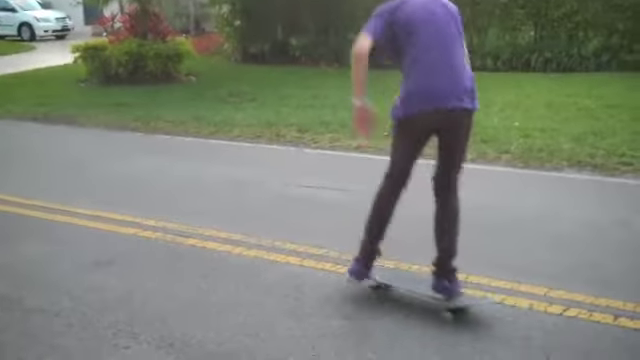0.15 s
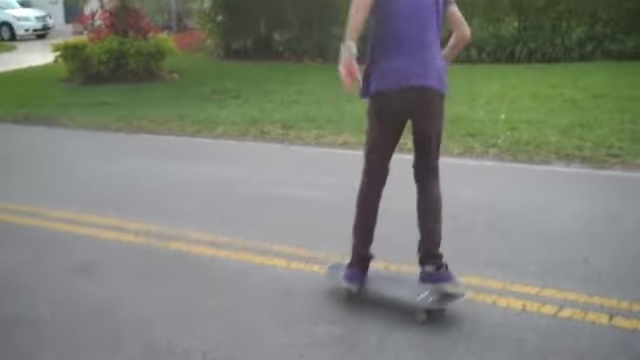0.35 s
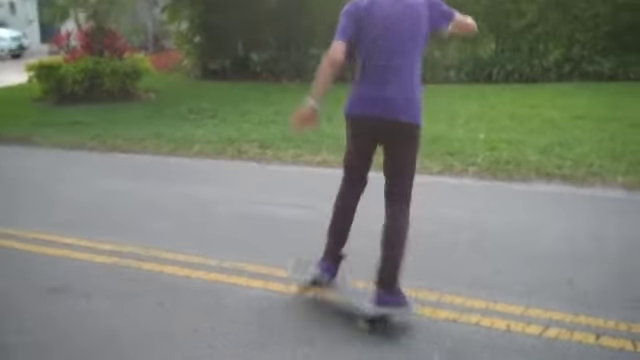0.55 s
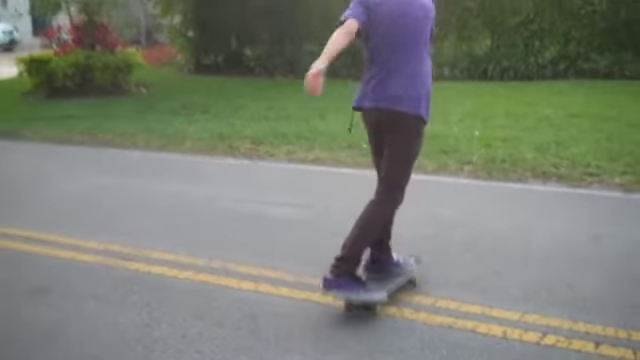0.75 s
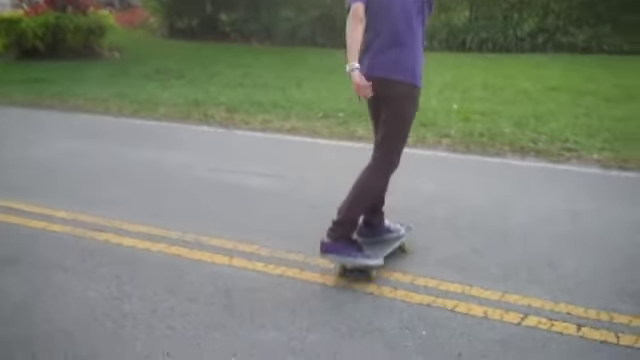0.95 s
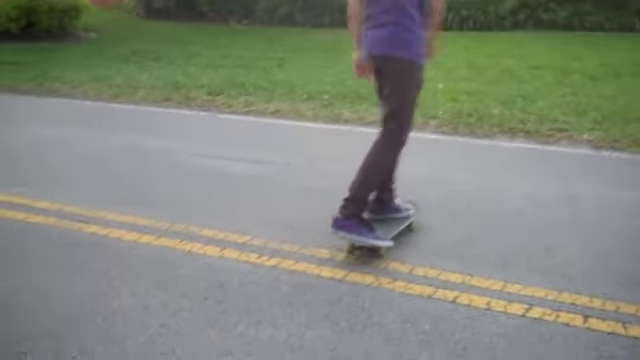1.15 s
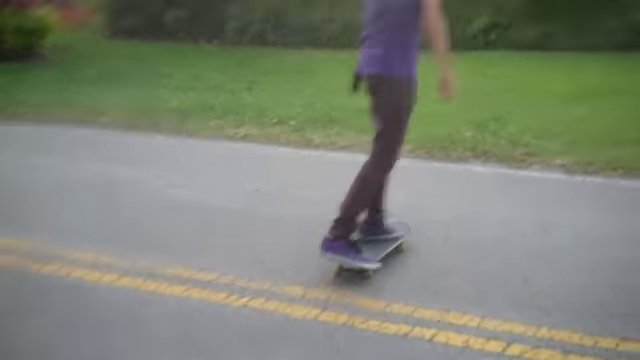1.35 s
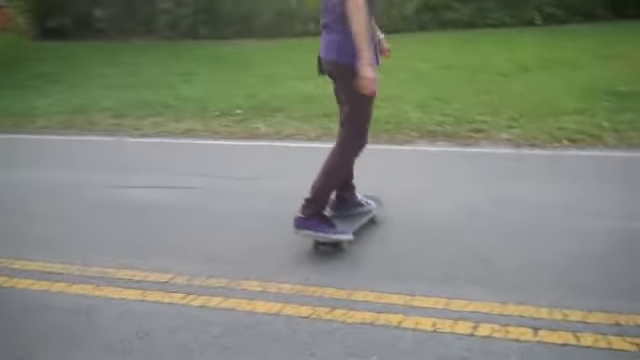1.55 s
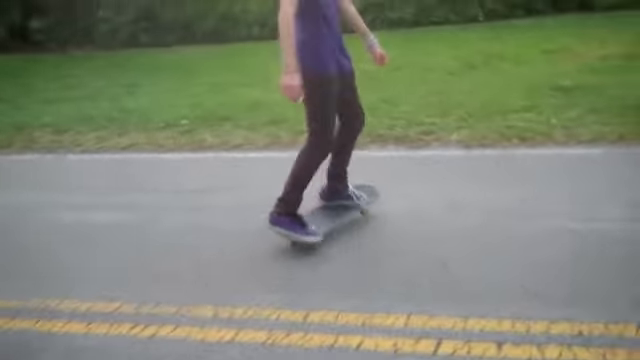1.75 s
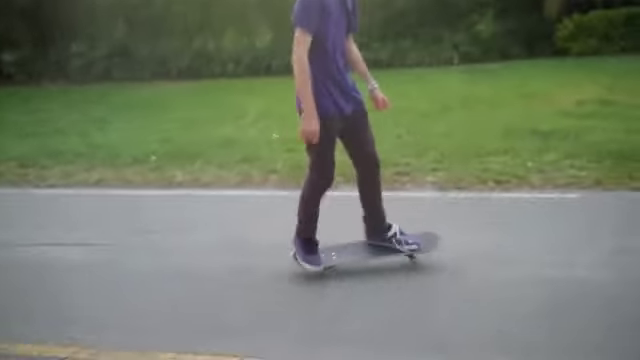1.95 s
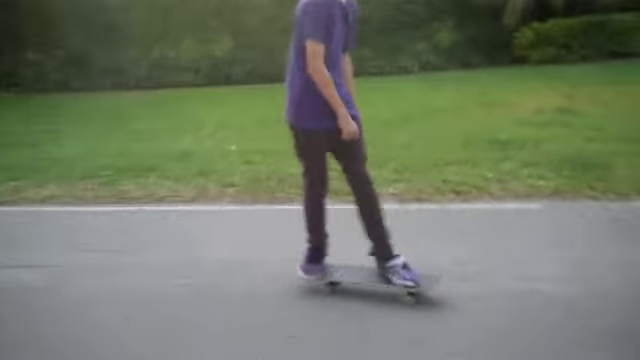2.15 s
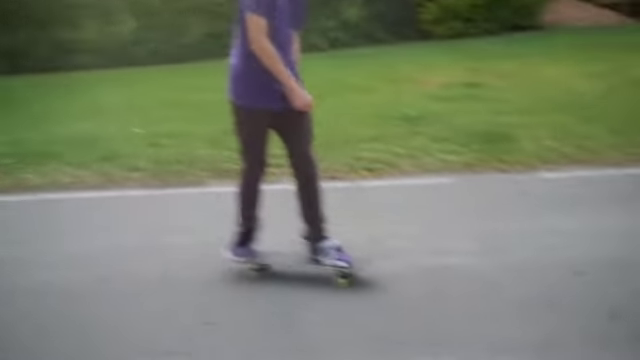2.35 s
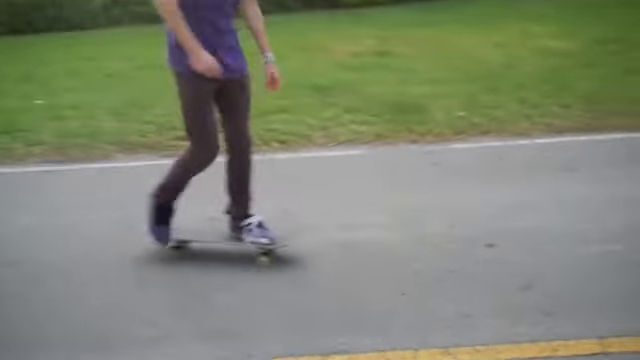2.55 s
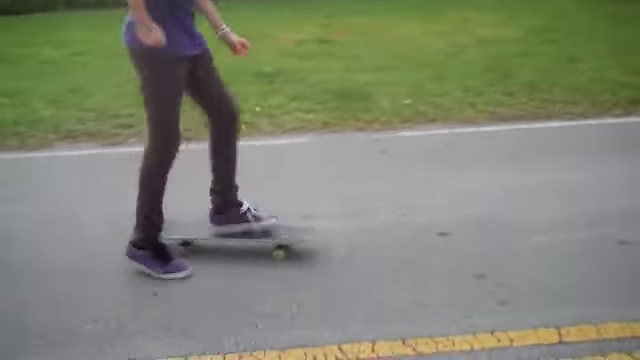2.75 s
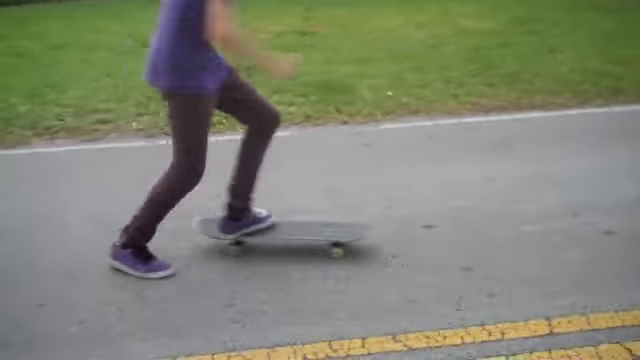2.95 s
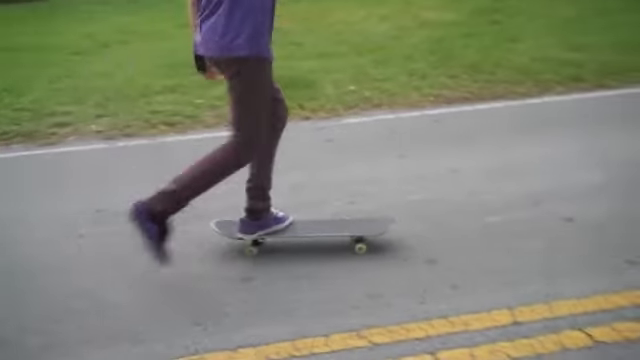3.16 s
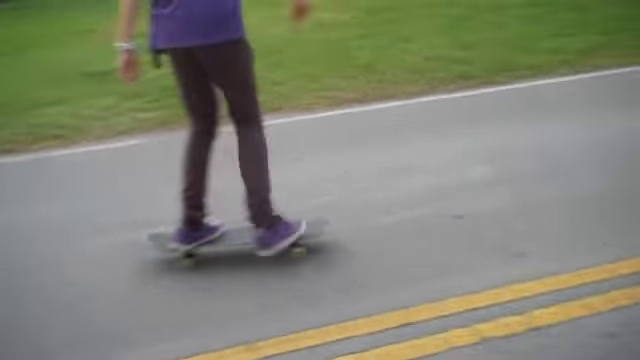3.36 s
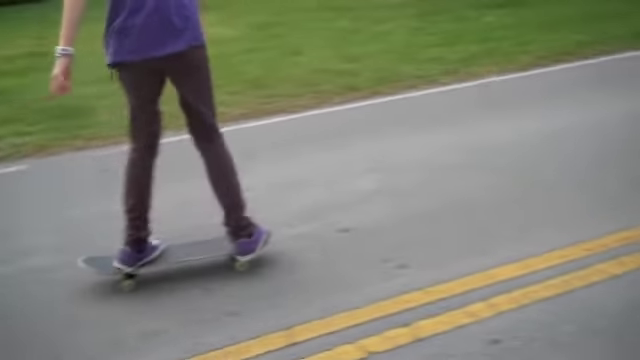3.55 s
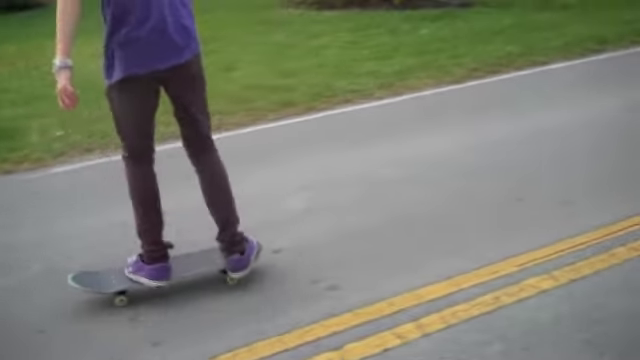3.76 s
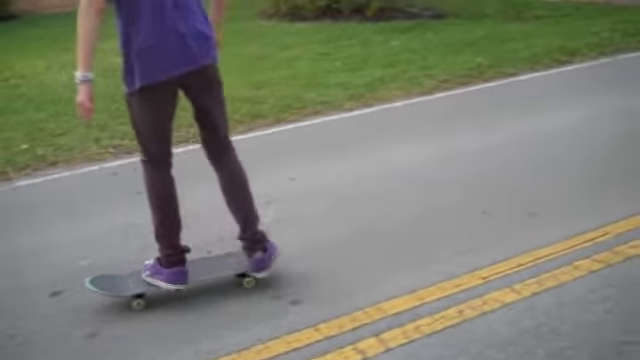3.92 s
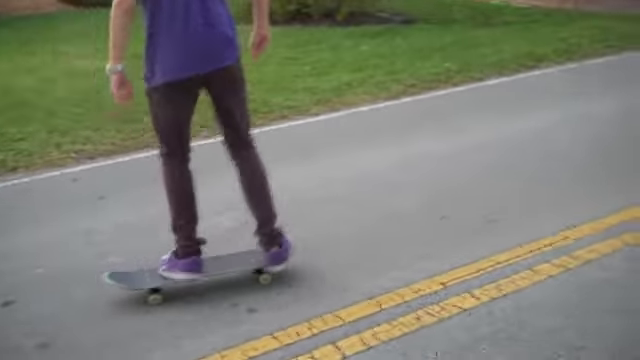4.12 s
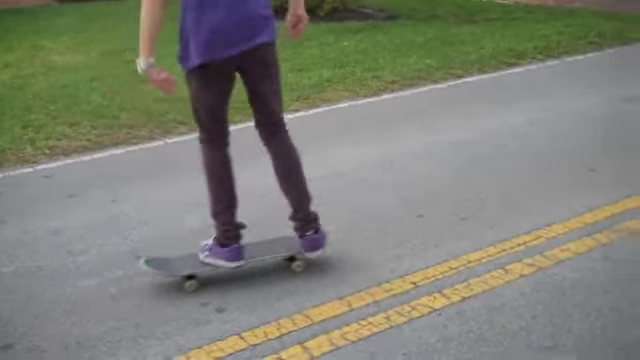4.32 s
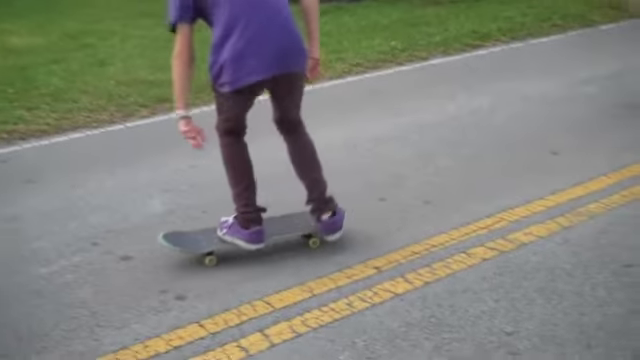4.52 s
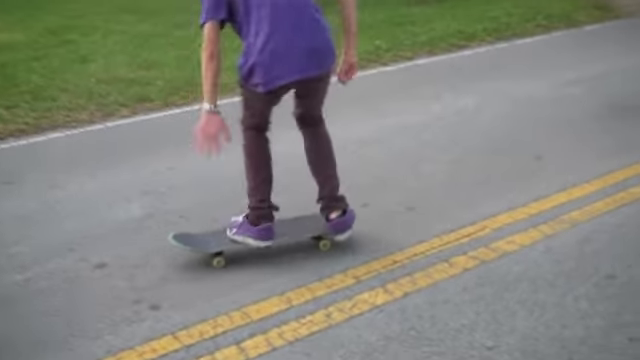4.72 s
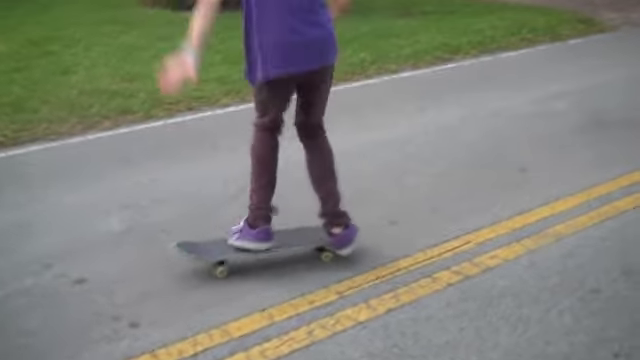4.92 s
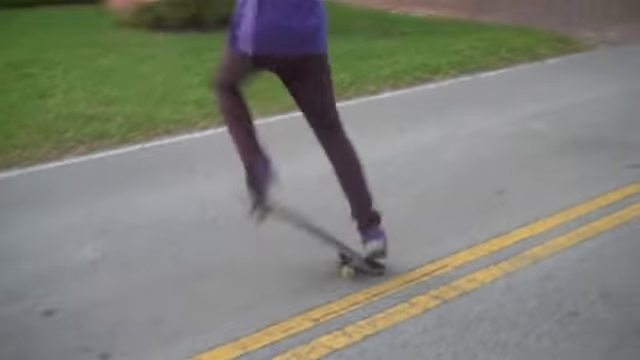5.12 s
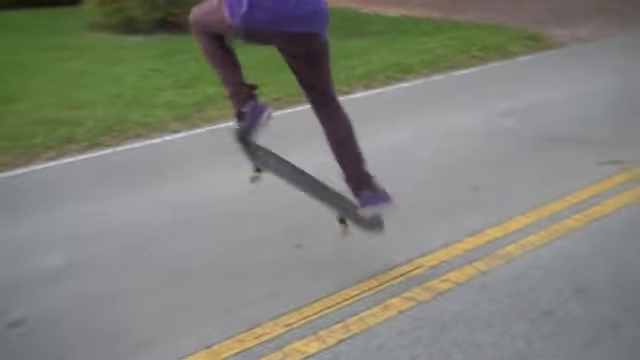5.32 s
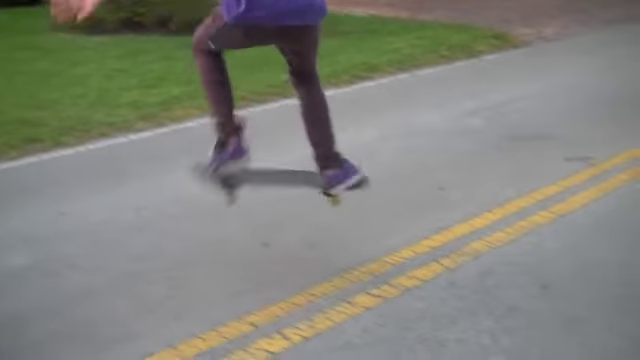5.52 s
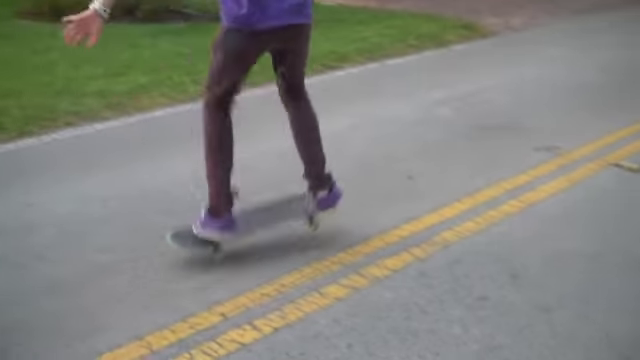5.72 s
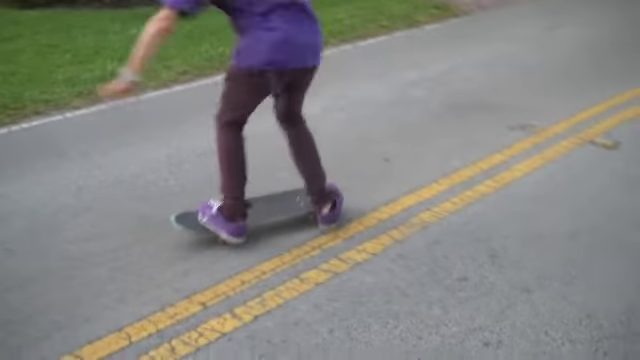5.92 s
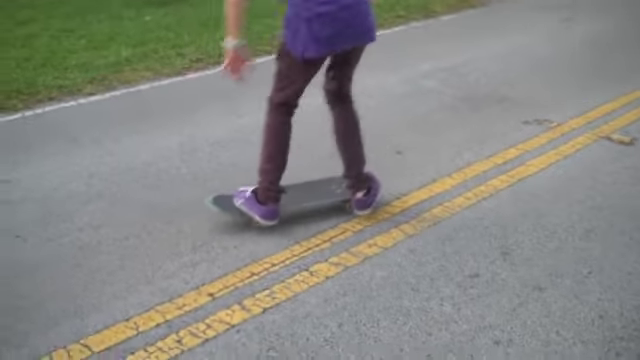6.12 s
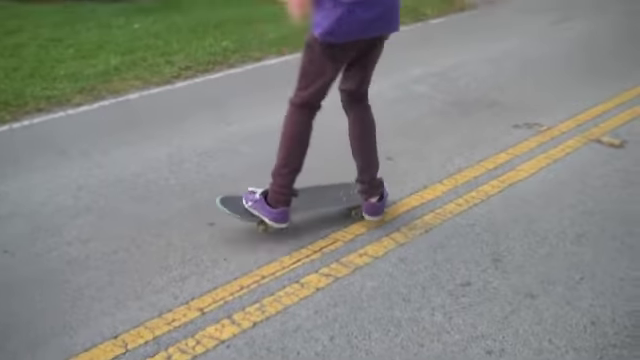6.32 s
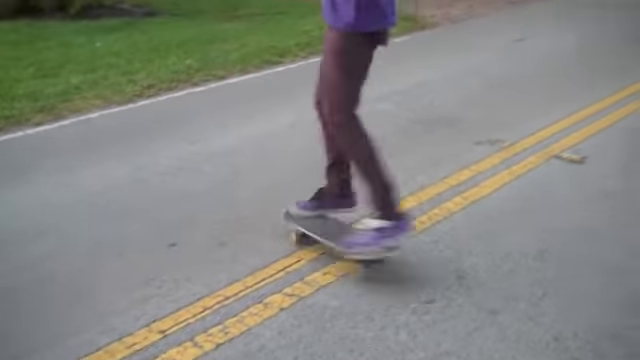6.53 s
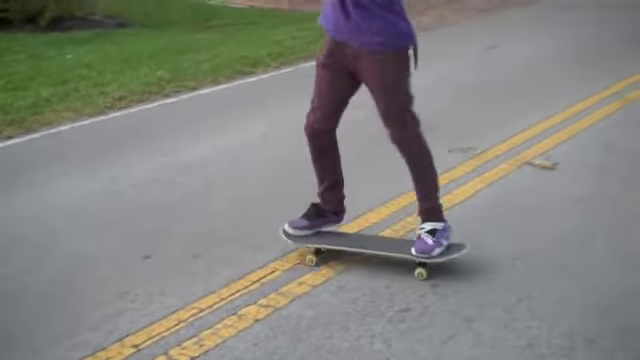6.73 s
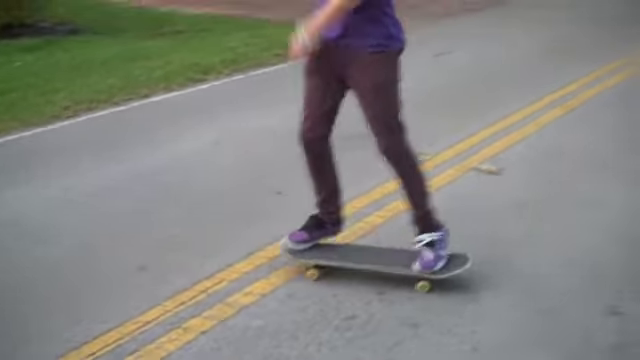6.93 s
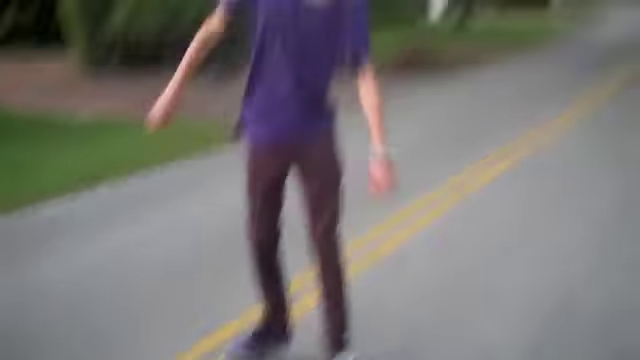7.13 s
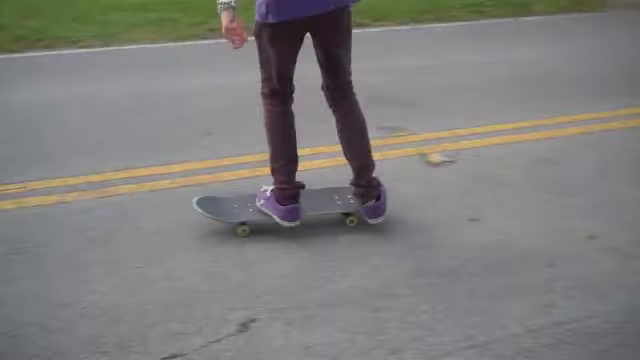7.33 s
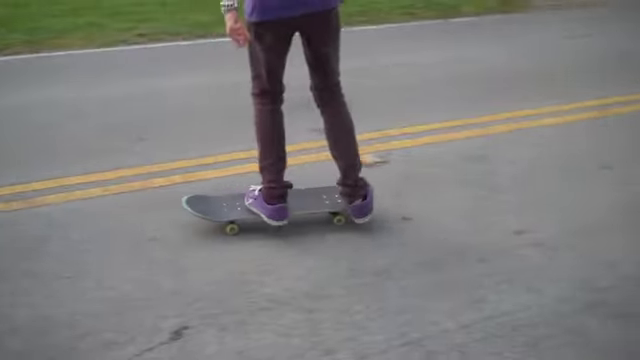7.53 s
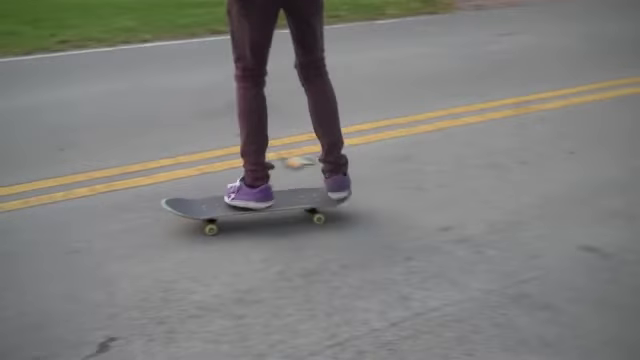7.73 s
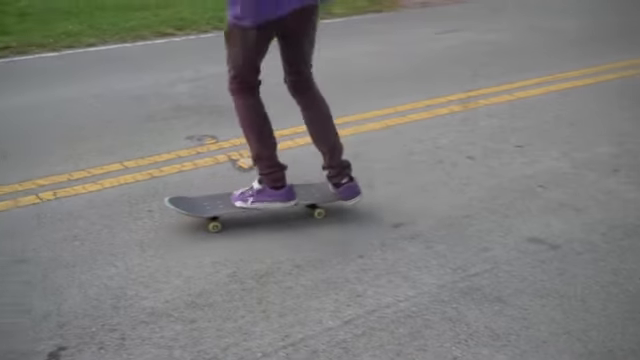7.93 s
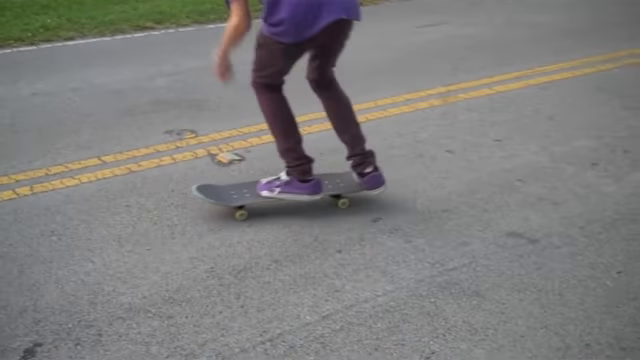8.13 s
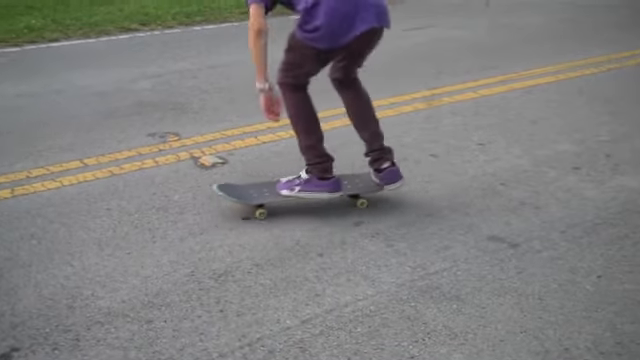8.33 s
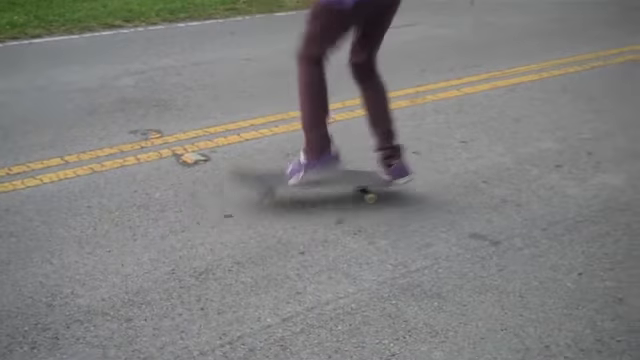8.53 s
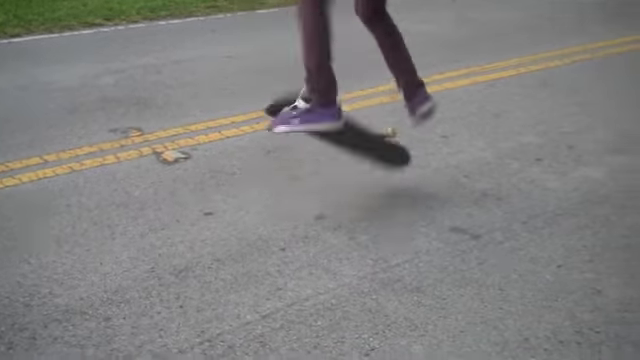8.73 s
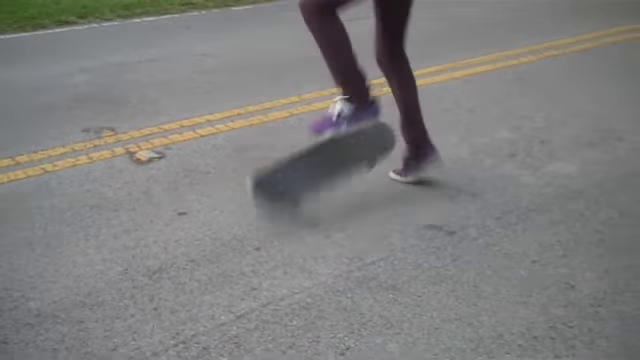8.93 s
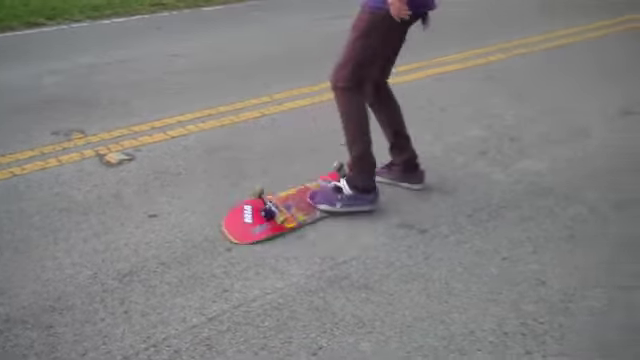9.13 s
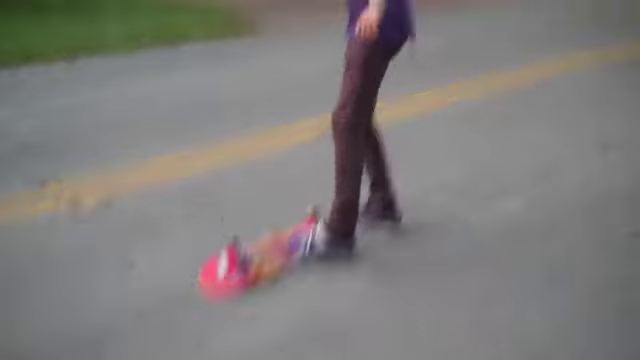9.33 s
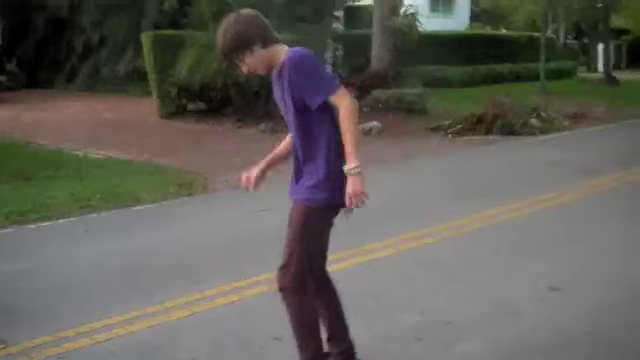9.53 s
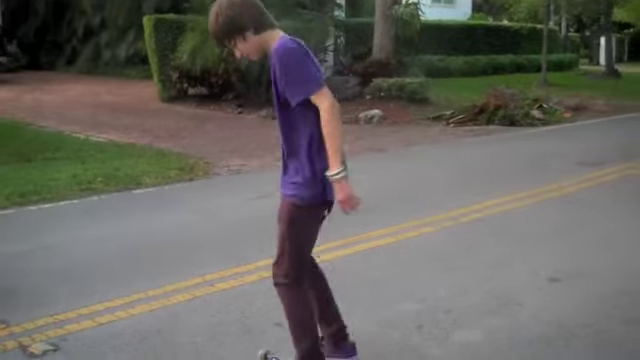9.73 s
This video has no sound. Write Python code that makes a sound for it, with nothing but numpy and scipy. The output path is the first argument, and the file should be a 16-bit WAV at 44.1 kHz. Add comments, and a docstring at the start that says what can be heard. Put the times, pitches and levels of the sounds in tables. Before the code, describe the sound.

Close stereo sound of a skateboard on rough asphalt in a quiet street with a faint echo. It opens with a rapid burst of hard wood-and-metal clacks within 0.12 s, then gritty rolling, a scrape and another sharp clack near 0.85. Rolling swells around 2.0; a bright clack at 2.3 leads into rubbery sole scuffs, a swivelling grind from 2.7 and ticks at 2.9-3.3. Wheels rumble and hum waveringly from 3.7 to 4.6. About 4.8-6.0 everything runs at half speed, an octave lower: grinding, a dull pop at 5.3, a pebble knock, then a strong woody landing at 5.93. Normal speed returns with a pivot scrape at 6.5, clacks at 6.75 and 7.26, and fuller rolling from 7.5. Quick metallic ticks patter through 8.0-8.4. A pop at 8.76 precedes two loud, distorted slams at 9.09 and 9.16, a smaller knock, then faint scrapes and ticks.

```python
"""A skateboard rolls over rough asphalt: grit contacts ring damped resonances of deck, wheels and trucks.
Grinds raise the grit's level as the rider shoves and swivels; bearings click, loaded wheels hum.
Blows ring the board and leave it shaking; skids, scuffs, steps, ticks and pebbles are timed noise bursts.
One ollie passes at half speed, an octave lower; at the end the board slams down on its back.
Close stereo microphone on a quiet street with a faint echo; the hardest landings overload it."""
import sys
import numpy as np
from scipy import signal
from scipy.fft import rfft, irfft, next_fast_len
from scipy.io import wavfile
from scipy.ndimage import uniform_filter1d, map_coordinates

SR = 44100
rng = np.random.default_rng(int(sys.argv[2]) if len(sys.argv) > 2 else 0)


def pcm_store(signal):
    """Save signal as 16-bit PCM."""
    levels = np.round(np.clip(np.atleast_2d(signal), -1, 1) * 32767)
    wavfile.write(sys.argv[1], SR, levels.astype(np.int16).T)


N = 435266
TIME_S = np.arange(N) / SR

# Times are as heard; lengths are at normal speed.
# Rolling over the ride; rumble is high while the rider's weight is on the deck:
# time_s, roll_db, rumble_re_roll_db
ROLL = [(0, -42, 6.5), (.34, -46.5, -4.5), (.55, -40.5, -6), (1.05, -49, -2.5), (2.0, -40, 0),
        (2.3, -45.5, -4.5), (2.73, -52.5, -3.5), (2.9, -43, -29), (3.15, -39, -7), (3.4, -43, -6),
        (3.68, -45.5, 0), (3.78, -40.5, -2.5), (4.2, -42.5, -1), (4.38, -37.5, -10.5), (4.551, -43, 2.5),
        (4.7, -41, 0.5), (4.851, -43, -6), (5.851, -50.5, -2), (6.05, -49.5, -18.5), (6.4, -50, 0.5),
        (6.85, -46, -3.5), (7.4, -48, -2.5), (7.53, -40, -0.5), (7.95, -43.5, -4), (8.1, -45.5, 0),
        (8.36, -47, 1.5), (8.5, -49, -11), (8.85, -47.5, 1.5), (9.0, -53.5, 1.5), (9.87, -54.5, 2)]
# Blows of tail, wheels and deck on the road; deck pitch depends on where the board is struck:
# start_s, knock_db, rattle_s, thud_re_knock_db, wood_re_knock_db, metal_re_knock_db, deck_pitch_ratio
BLOWS = [(.009, -17, .005, -15, -3, 0, 1), (0.015, -19, 0.0035, -14, -11, 4, 0.93),
         (0.0241, -19, 0.01, -24, -1, 1, 1.17), (0.065, -10, 0.0064, -16, -5, 0.5, 0.98),
         (.075, -19, 0.0045, -10, 5.5, 1, 1.02), (0.0925, -11, 0.0018, -16.5, -8.5, -11, 1.24),
         (.115, -22, 0.0082, -4, 2.5, -0.5, 0.94), (.399, -25.5, 0.0071, -15, -6.5, -2, 1.06),
         (0.4578, -27.5, 0.01, -10, 3.5, 6, 1), (0.8113, -23, 0.0048, -30, -1, -3, 1.1),
         (0.841, -15, 0.0041, -16, -8.5, -2.5, 0.97), (0.8551, -17, 0.005, -10, -6, 0.5, 1),
         (1.142, -29, 0.0055, -6.5, -0.5, -2, 1.22), (2.2796, -15.5, 0.0025, -47, -10, 2, 1.044),
         (3.76, -29.5, 0.01, -19, 0, 2.5, 0.99), (4.455, -23.5, 0.0091, -7.5, -5, 1, 1.02),
         (5.313, -15.5, 0.0053, -9.5, -2, 2, 1), (5.927, -11, 0.0075, -3.5, 7.5, 5, 1),
         (6.745, -19, 0.0026, -17, -2.5, 3, 0.97), (6.7539, -15.5, 0.0057, -35, -8.5, 0.5, 0.96),
         (6.778, -22, 0.0089, -30, -6, 1, 0.99), (7.2574, -19.5, 0.005, -20, -1, 1.5, 1.05),
         (7.262, -17.5, 0.0073, -11.5, 5, 4.5, 1), (8.756, -18, 0.0077, -14.5, -10.5, -2, 1.03),
         (9.045, -36.5, .0024, 2, 3, -10, 1.02), (9.09, -7, 0.0039, -2, -0.5, 1.5, 0.99),
         (9.105, -21.5, 0.0035, 0, 6.5, -1, 1.01), (9.1553, -7.5, 0.0035, -2, 7, -4.5, 1.075),
         (9.217, -18.5, 0.007, -11, 2.5, -3, 0.95)]
# Sharp ticks of bearings and loose stones: start_s, level_db
TICKS = [(2.905, -20), (3.189, -19), (3.224, -23), (3.304, -18), (3.326, -18), (3.342, -11), (4.597, -12),
         (4.687, -25), (4.706, -21), (5.272, -11), (5.281, -8), (6.399, -23.5), (6.698, -13), (7.116, -20),
         (7.9997, -18), (8.0423, -13.5), (8.061, -16), (8.072, -17), (8.1425, -15), (8.19, -14.5),
         (8.2312, -12.5), (8.286, -17), (8.327, -13), (8.3805, -25), (8.4015, -16), (8.434, -14.5),
         (9.586, -14), (9.828, -14.5)]
# Pebbles cracking under a wheel, higher for small stones: start_s, level_db, pitch_ratio
PEBBLES = [(3.557, -22, 1.4), (4.049, -20.5, 1.07), (4.903, -24, 2.2), (4.934, -21.5, 1.9),
           (5.605, -16, 1.76), (7.215, -22.5, 1.1)]
# Skids of wheels, soles and deck: start_s, length_s, level_db, pitch_hz, width_hz
SKIDS = [(0.576, 0.065, -35, 3470, 500), (0.738, 0.15, -31, 1690, 1000), (0.808, 0.034, -22.5, 1770, 700),
         (1.144, 0.041, -32.5, 805, 550), (1.172, 0.32, -41, 2300, 1403), (1.771, 0.26, -34.5, 1960, 1600),
         (2.477, 0.066, -38, 750, 680), (2.821, 0.49, -42.5, 1530, 1090), (5.121, 0.1, -25.5, 7380, 2500),
         (6.038, 0.29, -42, 1350, 1290), (6.57, .17, -36.5, 1700, 1470), (6.924, 0.075, -33, 7100, 1490),
         (7.733, 0.067, -28, 6750, 900), (8.395, 0.3, -39.5, 2540, 3870), (8.72, 0.1, -34, 6900, 2580),
         (9.24, 0.24, -43, 840, 450), (9.783, 0.1, -37, 1940, 1510)]
# Board ground over grit by a shove or swivel; bass is the weight behind it:
# start_s, length_s, level_db, bass_re_level_db
GRINDS = [(0.618, 0.39, -43.5, 5), (2.702, 0.51, -37.5, 3), (3.488, 0.11, -39.5, 4.5),
          (4.27, 0.18, -42, -6), (5.005, 0.24, -34.5, 8), (5.612, 0.047, -39.5, 3),
          (6.421, 0.031, -40.5, -26), (6.538, 0.22, -41, 6.5), (7.097, 0.076, -43.5, -18),
          (7.254, 0.079, -40.5, -15), (7.78, 0.27, -39.5, 1), (8.613, 0.24, -37, 0.5),
          (9.602, 0.1, -48, 12), (9.786, 0.19, -44.5, 7)]
# Feet coming down or pushing off on deck or road: start_s, level_db
STEPS = [(2.882, -35), (3.557, -33.5), (3.93, -33.5), (5.14, -28), (5.23, -31.5), (6.029, -33.5),
         (8.66, -35.5)]
# Sole dragged over grip tape or road: start_s, length_s, level_db
SCUFFS = [(0.208, 0.14, -34.5), (0.38, 0.0077, -31), (0.638, 0.055, -26), (2.293, 0.015, -30),
          (2.313, 0.12, -31), (2.44, 0.033, -33.5), (2.584, 0.03, -39), (2.658, 0.031, -38),
          (9.361, 0.0176, -31)]
# Stretches where the wheels sing: start_s, length_s, level_db, overtone_re_level_db
HUMS = [(2.847, 0.95, -52, -12), (3.683, 0.97, -42.5, -20), (4.305, 0.21, -44, 1.5), (7.544, 0.89, -51, -5),
        (7.797, 0.24, -42.5, -4)]
# Brief level dips between tricks: middle_s, width_s
DIPS = [(4.822, 0.096), (5.962, 0.057), (7.422, 0.055)]

# Flexing of the board: pitch_hz, width_hz, level_db
FLEX_MODES = [(119, 23, -9.5), (268, 180, 0), (350.5, 54, 0.5)]
# Whole deck bending under a blow: pitch_hz, width_hz, level_db
THUD_MODES = [(125, 60, -16), (350, 120, 1.5)]
# Deck resonances: pitch_hz, width_hz, level_db
DECK_MODES = [(601, 64, -5.5), (733.4, 142, 1), (867, 113, -4)]
# Deck overtones that only a blow wakes: pitch_hz, width_hz, level_db
DECK_OVERTONES = [(1408, 117, -9.5), (2300, 150, -16)]
# Wheel resonances: pitch_hz, width_hz, level_db
WHEEL_MODES = [(1465, 290, 4), (1863, 216, 1), (2291, 280, 2.5), (2790, 480, -8), (3480, 320, -8)]
# Truck resonances: pitch_hz, width_hz, level_db
TRUCK_MODES = [(3260, 1020, -2.5), (4960, 1500, -6.5), (6946, 1680, 2), (7300, 1430, -4.5),
               (8080, 1470, -10), (9740, 910, -12.5), (13220, 24000, -21.5)]
# Sole resonances before bending: pitch_hz, width_hz, level_db
SOLE_MODES = [(2660, 470, -0.5), (3650, 700, -4.5), (5170, 490, 0.5), (7100, 1100, 1)]

# Left port against right: freq_hz, left_re_right_db, left_lead_rad, likeness_ratio
PORTS = [(100, -1, -0.31, 1), (2000, 0, 0.0047, 0.93), (5200, 0.5, -0.93, 0.99), (6660, -4, -0.13, 0.35),
         (7360, 2, -0.39, 0.27), (7900, 10.5, 0.79, 0.49), (10000, 7.5, -1.6, 0.46), (13000, 20, -.7, .5)]
# Street echo decay: freq_hz, t60_s
STREET = [(150, 0.23), (800, 1.05), (3000, 1.8), (9000, 1.8)]

# Answer of each part of the board: to_rolling_db, to_grinding_db, to_shaking_db
# Flexing
RUMBLE_DB = (-1.5, -16.5, -11.5)
# Deck
DRONE_DB = (0.6, -6, -10)
# Wheels
SCRUB_DB = (-0.3, 0.5, -6.5)
# Trucks
SIZZLE_DB = (1, 6.5, -1)

SLOW_FROM_S, SLOW_TO_S = 4.82, 5.96
MIC_EDGE_HZ, EDGE_HZ = 14400, 16400
GRAVEL_PER_S, GRAVEL_RE_ROLL_DB = 70, -4.5
BEARING_CLICKS_PER_S, BEARING_RE_ROLL_DB = 55, -3.5
# Sizzle and bearings gain this many extra dB per dB of rolling above the cruise
CRUISE_DB, SIZZLE_GROWTH_DB_PER_DB = -49.5, 0.42
GRIND_TAPER_RATIO = 0.47  # share of a grind spent swelling and fading
SHAKE_RE_KNOCK_DB, SHAKE_DB_PER_THUD_DB, SHAKE_FALL_DB_PER_S = -25.5, 0.097, 72
STRIKE_RATIO = 0.5  # first clean contact re the chatter that follows
PEBBLE_RATTLE_S = 0.0028
SKID_SAG_RATIO = 0.039  # pitch fall as a skid slows
STEP_DECAY_S, STEP_DECK_RE_FLEX_DB = 0.02, 5
SOLE_BEND_RATIO = 0.03  # rms wander of the sole resonances
HUM_HZ, OVERTONE_HZ, HUM_WAVER_RATIO = 731, 2280, 0.03216  # waver of the lower note


def gain_of(db):
    """Decibels to amplitude."""
    return 10 ** (np.asarray(db) / 20)


def unit_rms(x):
    """Scales to rms 1."""
    return x / np.sqrt(np.mean(x ** 2) + 1e-20)


def read(points, hz):
    """Table columns interpolated over log frequency."""
    f, *columns = np.transpose(points)
    return [np.interp(np.log(hz + 1), np.log(f), c) for c in columns]


def street_time(heard_s):
    """Street time at a heard time; it runs at half speed in the slow motion."""
    return heard_s - .5 * np.clip(heard_s - SLOW_FROM_S, 0, SLOW_TO_S - SLOW_FROM_S)


def add(mix, heard_s, sound):
    """Mixes a sound in so that it is heard at the given time."""
    start = max(round(street_time(heard_s) * SR), 0)
    part = mix[start:][:len(sound)]
    part += sound[:len(part)]


def low_pass(x, hz):
    """Steep band limit on both channels."""
    taps = signal.firwin(301, hz, window=("kaiser", 8), fs=SR)
    return signal.oaconvolve(x, taps[None], "same")


def ring(x, modes, size=4096):
    """Causal minimum-phase response of damped resonances with steep skirts."""
    hz = abs(np.fft.fftfreq(size, 1 / SR)) + 1
    power = 0
    for f, width, db in modes:
        detune = (hz ** 2 - f ** 2) / (2 * width * np.sqrt(hz * f))
        power = power + gain_of(db) ** 2 / (1 + detune ** 2 * 2) ** 2
    log_gain = .5 * np.log(power + 1e-10)
    taps = np.fft.ifft(np.exp(np.conj(signal.hilbert(log_gain)))).real
    return signal.oaconvolve(x, taps[:size // 2])[:len(x)]


def grit(per_s, spread_db, size=N):
    """Random stone contacts: most are small, a few large."""
    heights = gain_of(spread_db * np.minimum(rng.exponential(1, size), 3.7))
    return heights * rng.choice([-1, 1], size) * (rng.random(size) < per_s / SR)


def wander(hz):
    """Smooth random signal of rms 1, up to about the given rate."""
    size = next_fast_len(N)
    spectrum = rfft(rng.standard_normal(size))
    smooth = irfft(spectrum / (1 + (np.fft.rfftfreq(size, 1 / SR) / hz) ** 4), size)
    return unit_rms(smooth[:N])


def together(levels_db, *strengths):
    """Unrelated causes add in power, each at its own level."""
    return np.sqrt(sum((gain_of(db) * x) ** 2 for db, x in zip(levels_db, strengths)))


def chatter(rattle_s, size=4096):
    """One clean strike and a dying run of contacts, energy spread fairly evenly over frequency."""
    t = np.arange(size) / SR
    contacts = rng.standard_normal(size) * np.exp(-t / rattle_s)
    spectrum = rfft(contacts / np.linalg.norm(contacts) + STRIKE_RATIO * (t == 0))
    flatter = irfft(spectrum / np.sqrt(abs(spectrum) + 1e-9))
    return flatter * np.exp(-(t / (2 * np.pi * rattle_s)) ** 2)


def shifting(x, depth_db, size=512):
    """The contact point moves, so overtones vary in patches of about 400 Hz and 15 ms."""
    overlap = size * 3 // 4
    hz, _, z = signal.stft(x, SR, nperseg=size, noverlap=overlap)
    patches = uniform_filter1d(rng.standard_normal(z.shape), size=5, axis=0)
    patches = unit_rms(uniform_filter1d(patches, size=5, axis=1))
    # low deck modes answer alike wherever they are struck
    depth = depth_db * np.sqrt(hz / (hz + 1000))[:, None]
    gain = gain_of(depth * np.clip(patches, -2, 2))
    z = z * gain / np.sqrt(np.mean(gain ** 2, axis=1, keepdims=True))
    return signal.istft(z, SR, nperseg=size, noverlap=overlap)[1][:N]


def street(x):
    """Hedges and house fronts scatter a faint, dull tail."""
    echoes = rng.standard_normal(SR) * (rng.random(SR) < 2500 / SR)
    echoes = echoes * (1 - np.exp(-TIME_S[:SR] / 0.003))
    hz, t, z = signal.stft(echoes, SR, nperseg=256)
    decay = gain_of(-60 * t / read(STREET, hz)[0][:, None])
    z = z * decay / np.hypot(1, hz / 2500)[:, None]
    tail = signal.istft(z, SR, nperseg=256)[1]
    return signal.fftconvolve(x, tail / np.linalg.norm(tail))[:N]


def ports(x):
    """Two close ports hear nearly the same bass; the housing shades and scatters the treble."""
    hz, _, z = signal.stft(x, SR, nperseg=64)
    balance_db, lead_rad, likeness = (c[:, None] for c in read(PORTS, hz))
    likeness = np.clip(likeness, 0, 1)
    random_phase = np.exp(2j * np.pi * rng.random(z.shape))
    scatter = np.sqrt((1 - likeness) / (1 + likeness)) * random_phase
    lean = gain_of(balance_db / 2) * np.exp(.5j * lead_rad)
    pair = np.array([z * (1 + scatter) * lean, z * (1 - scatter) / lean])
    pair = pair * 2 / abs(lean + 1 / lean)
    return signal.istft(pair, SR, nperseg=64)[1][:, :N]


def steps(size=8192):
    """A soft sole sets the deck flexing, with no crack."""
    out, t = np.zeros(N), np.arange(size) / SR
    for start_s, db in STEPS:
        force = rng.standard_normal(size)
        flex = unit_rms(ring(force, FLEX_MODES))
        deck = unit_rms(ring(force, DECK_MODES))
        thump = flex + gain_of(STEP_DECK_RE_FLEX_DB) * deck
        add(out, start_s, gain_of(db) * thump * np.exp(-t / STEP_DECAY_S))
    return out


def scuffs():
    """Rubber rasps over fine grit, abruptly on and off; the sole's resonances shift as it bends."""
    level = np.zeros(N)
    for start_s, length_s, db in SCUFFS:
        add(level, start_s, gain_of(db) * signal.windows.tukey(int(length_s * SR), .25))
    force = rng.standard_normal(N) * gain_of(2.6 * wander(hz=159))
    rasp = ring(force, SOLE_MODES)
    position = np.cumsum(1 + SOLE_BEND_RATIO * wander(hz=17))
    bent = map_coordinates(rasp, [position], order=3, mode="mirror")
    return level * unit_rms(bent)


def pebbles():
    """A pebble cracks under a wheel: a short, dry knock."""
    out = np.zeros(N)
    for start_s, db, pitch in PEBBLES:
        modes = np.multiply(WHEEL_MODES, [pitch, pitch, 1])
        crack = ring(chatter(PEBBLE_RATTLE_S), modes)
        add(out, start_s, gain_of(db) * crack / abs(crack).max())
    return out


def ticks(size=1024):
    """Tiny steel contacts ring the trucks for a millisecond or two."""
    out, t = np.zeros(N), np.arange(size) / SR
    for start_s, db in TICKS:
        force = rng.standard_normal(size) * np.exp(-t / 0.0009)
        tick = ring(force, TRUCK_MODES)
        add(out, start_s, gain_of(db - 0.5) * tick / abs(tick).max())
    return out


def skids():
    """Rubber sticks and slips: clumps of small slips feed a resonance that falls as the skid slows."""
    out = np.zeros(N)
    for start_s, length_s, db, pitch_hz, width_hz in SKIDS:
        count = int(length_s * SR)
        grip = unit_rms(uniform_filter1d(rng.standard_normal(SR // 2), size=260))
        slips = grit(per_s=1500, spread_db=3.5, size=SR // 2) * gain_of(0.53 * grip)
        glide_hz = pitch_hz * np.linspace(1, 1 - SKID_SAG_RATIO, count)
        turn = np.exp(2j * np.pi * np.cumsum(glide_hz) / SR)
        # shift down to 0 Hz, low-pass, shift back: a gliding band-pass
        b, a = signal.butter(2, width_hz / 2, fs=SR)
        scrape = (turn * signal.lfilter(b, a, slips[:count] / turn)).real
        add(out, start_s, gain_of(db) * unit_rms(scrape) * signal.windows.tukey(count, .45))
    return out


def humming():
    """Under the rider's weight the wheels sing two notes; the road makes pitch and strength waver."""
    low, high = np.zeros((2, N))
    for start_s, length_s, db, overtone_db in HUMS:
        swell = signal.windows.tukey(int(length_s * SR), .3)
        add(low, start_s, gain_of(db) * swell)
        add(high, start_s, gain_of(db + overtone_db) * swell)
    out = np.zeros(N)
    notes = [(HUM_HZ, HUM_WAVER_RATIO, low), (OVERTONE_HZ, HUM_WAVER_RATIO / 2, high)]
    for hz, waver, level in notes:
        cycles = np.cumsum(hz * (1 + waver * wander(hz=44.4))) / SR
        tone = np.sin(2 * np.pi * cycles) * gain_of(4.1 * wander(hz=30))
        out += level * unit_rms(tone)
    return out


def clacks(size=4096):
    """Each blow rings deck, wheels and trucks; levels are of energy packed into 5 ms."""
    out = np.zeros(N)
    packed = np.sqrt(.005 * SR / size)
    for start_s, db, rattle_s, thud_db, wood_db, metal_db, pitch in BLOWS:
        deck_modes = np.multiply(DECK_MODES + DECK_OVERTONES, [pitch, 1, 1])
        deck = unit_rms(ring(chatter(rattle_s), deck_modes))
        wheels = unit_rms(ring(chatter(rattle_s), WHEEL_MODES))
        thud = unit_rms(ring(chatter(rattle_s), THUD_MODES))
        metal = unit_rms(ring(chatter(rattle_s), TRUCK_MODES))
        blow = wheels + gain_of(wood_db) * deck + gain_of(thud_db) * thud + gain_of(metal_db) * metal
        add(out, start_s, packed * gain_of(db) * blow)
    return out


def bearings():
    """Almost evenly spaced clicks of uneven strength ring the trucks in bursts of 0.69 ms decay."""
    turns = np.cumsum(BEARING_CLICKS_PER_S * (1 + .3 * wander(hz=39.8))) / SR
    clicks = np.diff(np.floor(turns), prepend=0) * rng.random(N)
    bursts = signal.lfilter([1], [1, -np.exp(-1 / (0.00069 * SR))], clicks)
    return unit_rms(ring(bursts * rng.standard_normal(N), TRUCK_MODES))


def grinding():
    """Grind strength at the wheels, and at the deck as the rider's weight passes it on."""
    at_wheels, at_deck = np.zeros((2, N))
    for start_s, length_s, db, bass_db in GRINDS:
        swell = signal.windows.tukey(int(length_s * SR), GRIND_TAPER_RATIO)
        add(at_wheels, start_s, gain_of(db) * swell)
        add(at_deck, start_s, gain_of(db + bass_db) * swell)
    return at_wheels, at_deck


def shaking():
    """Uneven shaking that dies away after each blow, stronger with more thud."""
    power = np.zeros(N)
    for start_s, knock_db, _, thud_db, *_ in BLOWS:
        start_db = knock_db + SHAKE_RE_KNOCK_DB + SHAKE_DB_PER_THUD_DB * thud_db
        add(power, start_s, gain_of(start_db - SHAKE_FALL_DB_PER_S * TIME_S[:SR]) ** 2)
    return np.sqrt(power) * gain_of(2.0 * wander(hz=70))


def rolling():
    """Stones strike the wheels and ring every part of the board; bearings add their rattle."""
    time_s, *columns = np.transpose(ROLL)
    roll, weight = (gain_of(np.interp(TIME_S, street_time(time_s), c)) for c in columns)
    bright = (roll / gain_of(CRUISE_DB)) ** SIZZLE_GROWTH_DB_PER_DB
    grind, deck_grind = grinding()
    shake = shaking()

    stones = unit_rms(grit(per_s=520, spread_db=3.5))
    sand = unit_rms(grit(per_s=9000, spread_db=2.5))
    # coarse patches of road shake all parts together
    road = (sand + 0.88 * stones) * gain_of(2.1 * wander(hz=70))
    coarse = grit(per_s=GRAVEL_PER_S, spread_db=2.0)
    gravel = unit_rms(ring(coarse, DECK_MODES + WHEEL_MODES))
    gravel = gravel * np.sqrt(roll ** 2 + grind ** 2 + (shake / 2) ** 2)

    rumble = unit_rms(ring(road, FLEX_MODES)) * together(RUMBLE_DB, roll * weight, deck_grind, shake)
    drone = unit_rms(ring(road, DECK_MODES)) * together(DRONE_DB, roll, deck_grind, shake)
    scrub = unit_rms(ring(road, WHEEL_MODES)) * together(SCRUB_DB, roll, grind, shake)
    sizzle = unit_rms(ring(road, TRUCK_MODES)) * together(SIZZLE_DB, roll * bright, grind, shake)
    rattle = gain_of(BEARING_RE_ROLL_DB) * roll * bright * bearings()
    return rumble + drone + scrub + sizzle + gain_of(GRAVEL_RE_ROLL_DB) * gravel + rattle


def scene():
    """The board and its street echo at the two ports."""
    board = shifting(rolling() + skids(), depth_db=3.5)
    board = board + humming() + scuffs() + clacks() + steps() + ticks() + pebbles()
    return ports(board + gain_of(-23.5) * street(board))


def record(dry):
    """Microphone band and overload, half-speed stretch, brief level dips, final band limit."""
    band = low_pass(dry, MIC_EDGE_HZ)
    clipped = band / (1 + band ** 6) ** (1 / 6)
    # lopsided overload puts a low bump under the hardest blows
    heard = (clipped + .1 * clipped ** 4) * .89
    position = street_time(TIME_S) * SR
    slowed = np.array([map_coordinates(c, [position], order=4) for c in heard])
    for middle_s, width_s in DIPS:
        slowed = slowed * (1 - 0.96 * np.exp(-((TIME_S - middle_s) / width_s) ** 2))
    return low_pass(slowed, EDGE_HZ)


dry = scene()
out = record(dry)
pcm_store(out)
```